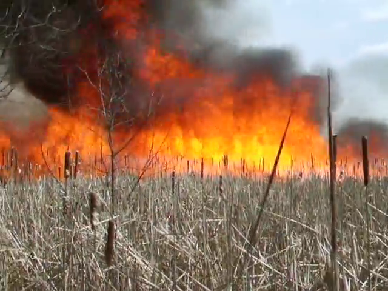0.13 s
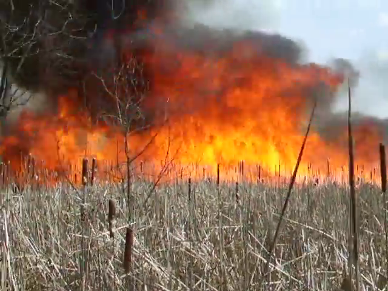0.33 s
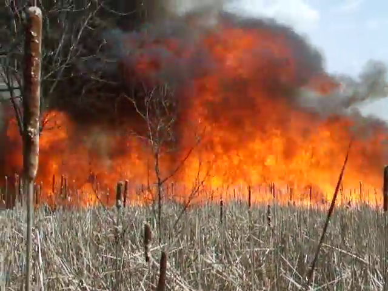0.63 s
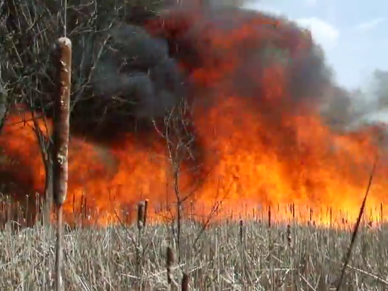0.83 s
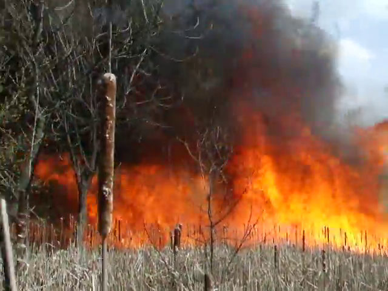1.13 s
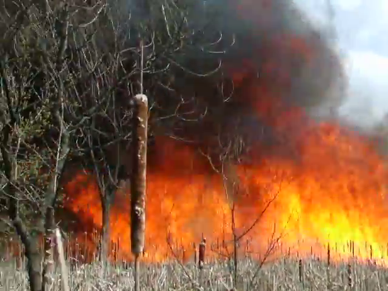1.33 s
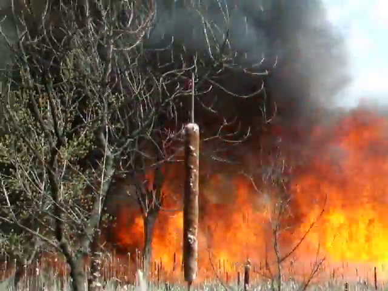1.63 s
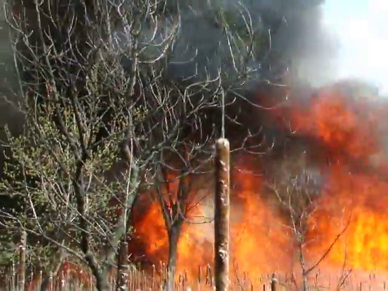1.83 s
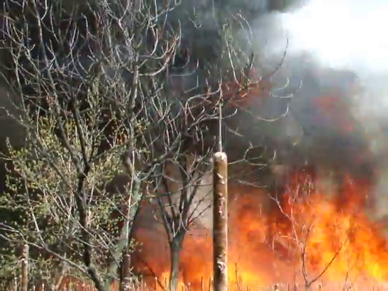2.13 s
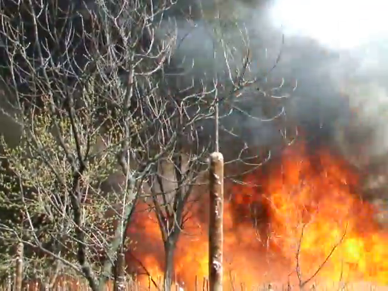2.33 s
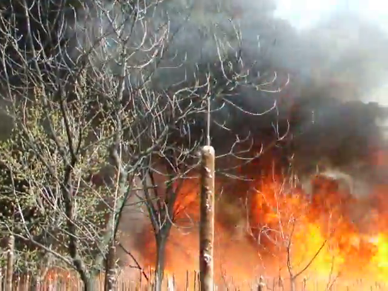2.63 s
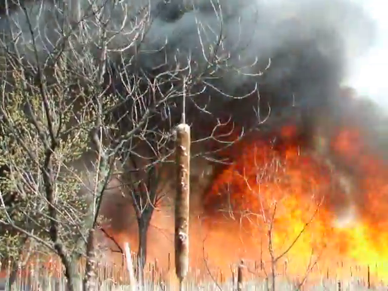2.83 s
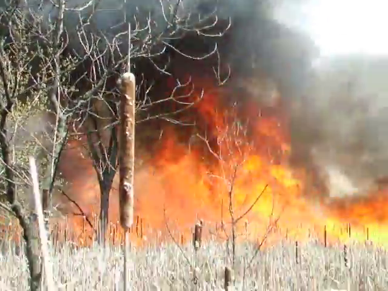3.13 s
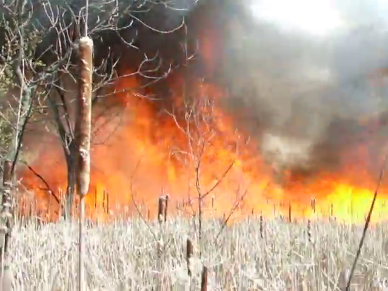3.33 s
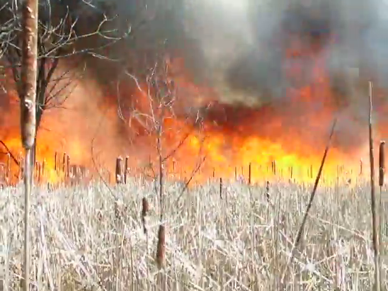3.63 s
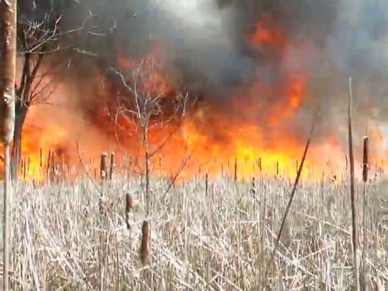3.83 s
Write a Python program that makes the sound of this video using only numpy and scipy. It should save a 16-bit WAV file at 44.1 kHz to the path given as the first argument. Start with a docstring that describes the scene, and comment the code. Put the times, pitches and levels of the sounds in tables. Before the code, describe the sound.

A wide fire in dry marsh reeds roars steadily over low rumble, with dense nearby crackle and hiss. Two pops come at the start; a faint falling bird-like chip at 1.04 s. Stems snap in a cluster around 1.5-1.6 s and again near 2 s. Bright sizzle swells about 2.4 and 3.5 s, with sharpest snaps from 3.4 to 3.9 s. A faint wavering mid-pitched hum fades. Open air, small mono microphone, treble cut steeply.

```python
"""Flames rumble under the blurred roar of far snaps as a wide front of dry reeds burns across open marsh.
Nearer stalks crackle and sizzle: dense ringing grains over hiss. Stems burst in short volleys of clicks.
A faint narrow hum is resonated noise that fades; one bird-like chip is a falling sine.
A small mono microphone picks it up; a resampler's low-pass cuts the top steeply."""
import sys
import numpy as np
from scipy import signal
from scipy.fft import rfft, irfft
from scipy.io import wavfile

SR = 44100
rng = np.random.default_rng(int(sys.argv[2]) if len(sys.argv) > 2 else 0)


def gain_from_db(level_db):
    """Turn a decibel level (scalar or array-like) into a linear amplitude factor."""
    decades = np.asarray(level_db, float) / 20
    return 10 ** decades


def generate_wav(sig):
    """Save sig (samples, or channels by samples) to the path in sys.argv[1] as 16-bit PCM at SR."""
    pcm = np.round(np.clip(np.atleast_2d(sig).T, -1, 1) * 32767).astype(np.int16)
    wavfile.write(sys.argv[1], SR, pcm)


N = 176400  # 4 s
TIME_S = np.arange(N) / SR


def rms_one(x):
    """Scale to unit rms."""
    return x / np.sqrt(np.mean(x ** 2) + 1e-20)


def level(rows):
    """Gain per sample, linear in dB between (t/s, level/dB) rows."""
    return gain_from_db(np.interp(TIME_S, *np.transpose(rows)))


def colour(x, points):
    """Shape a signal by (f/Hz, level/dB) points on a log frequency axis; rms 1."""
    hz, db = np.transpose(points)
    bins_hz = np.arange(N // 2 + 1) * SR / N
    gain = gain_from_db(np.interp(np.log(bins_hz + 1), np.log(hz), db))
    return rms_one(irfft(rfft(x) * gain, N))


def drift(rate_hz):
    """Slow random wander, rms 1: noise through a double one-pole low-pass at SR / 40."""
    r = np.exp(-80 * np.pi * rate_hz / SR)
    noise = rng.standard_normal(N // 40 + 2002)
    slow = signal.lfilter([1], [1, -2 * r, r * r], noise)[2000:]  # settled part
    slow = rms_one(slow - slow.mean())
    return np.interp(np.arange(N) / 40, np.arange(len(slow)), slow)


def resonate(x, hz, width_hz):
    """Two-pole resonance in which a unit click rings at height about 1."""
    r = np.exp(-np.pi * width_hz / SR)
    w = 2 * np.pi * hz / SR
    return signal.lfilter([0, np.sin(w)], [1, -2 * r * np.cos(w), r * r], x + 1e-18)


def grains(per_s, spread_db, low_hz, high_hz, cycles):
    """Random snaps of uneven size, each ringing a few cycles at one of 16 pitches, flat per Hz; rms 1."""
    sizes_db = spread_db * np.minimum(rng.exponential(1, N), 5)
    sizes = gain_from_db(sizes_db) * rng.choice([-1, 1], N)
    clicks = sizes * (rng.random(N) < per_s / SR)
    pitch_index = rng.integers(0, 16, N)
    total = np.zeros(N)
    for k, hz in enumerate(np.geomspace(low_hz, high_hz, 16)):
        total += hz * resonate(clicks * (pitch_index == k), hz, 2.86 * hz / cycles)
    return rms_one(total)


def rumble():
    """Turbulent burning: low noise with a slightly wandering level."""
    # rumble spectrum: f/Hz, level per Hz/dB
    spectrum = [(8, -23.5), (20, -2.5), (65, 0), (200, 0), (300, -3), (390, -11.5), (600, -25), (2000, -69)]
    return gain_from_db(-35 + .5 * drift(6)) * colour(rng.standard_normal(N), spectrum)


def roar():
    """Distant snaps too many to tell apart: coloured noise."""
    # roar spectrum: f/Hz, level per Hz/dB
    spectrum = [(150, -39.5), (390, -8), (600, -2.5), (850, 0), (1100, -3), (1400, -5), (1750, -12.5),
                (2500, -15), (5000, -13.5)]
    # roar level: t/s, level/dB
    swell = [(0.0, -30), (0.59, -31), (1.14, -30), (2.91, -30.5), (4.0, -32.5)]
    return level(swell) * gain_from_db(0.27 * drift(15)) * colour(rng.standard_normal(N), spectrum)


def snaps_and_hiss(clump, low_hz, high_hz):
    """Dense ringing snaps, their rate following the clumps, over white hiss."""
    snaps_per_s, spread_db, cycles = 2500, 2, 2.3
    snap_share = 0.48  # of power
    snaps = grains(snaps_per_s * clump ** 2, spread_db, low_hz, high_hz, cycles)
    return np.sqrt(snap_share) * snaps + np.sqrt(1 - snap_share) * rng.standard_normal(N)


def crackle(clump):
    """Nearer stalks: clumped snaps and hiss shaped by one spectrum."""
    # crackle spectrum: f/Hz, level per Hz/dB
    spectrum = [(500, -27), (1400, -2.5), (2000, 0), (2600, -3), (4200, -3), (5800, -8.5), (7400, -8.5),
                (8200, -14), (9500, -10)]
    # crackle level ahead of clumping: t/s, level/dB
    swell = [(0.0, -33.5), (1.07, -35.5), (1.63, -33), (2.49, -34.5), (2.93, -34.5), (3.59, -34.5),
             (4.0, -36)]
    return clump * level(swell) * colour(snaps_and_hiss(clump, 1000, 10000), spectrum)


def sizzle(clump):
    """Brighter snaps and hiss through two equal resonances, plus tiny ticks; swells on its own."""
    # sizzle level ahead of clumping, ticks extra: t/s, level/dB
    swell = [(0.0, -44), (0.1, -51.5), (1.07, -49.5), (1.31, -42.5), (1.64, -38), (2.38, -33.5),
             (2.96, -41.5), (3.22, -37.5), (3.52, -32), (3.71, -35.5), (3.93, -38), (4.0, -36.5)]
    centre_hz, stage_width_hz = 7220, 3960
    ticks_per_s, tick_spread_db, tick_db = 120, 3.5, -7  # tick_db re sizzle body
    body = resonate(snaps_and_hiss(clump, 5000, 11000), centre_hz, stage_width_hz)
    body = rms_one(resonate(body, centre_hz, stage_width_hz))
    ticks = gain_from_db(tick_db) * grains(ticks_per_s, tick_spread_db, 7400, 9500, 9.4)
    return clump * level(swell) * gain_from_db(1.4 * drift(56)) * (body + ticks)


def hum():
    """Noise through two equal narrow resonances: a wavering tone that slowly fades."""
    centre_hz, stage_width_hz = 1133.3, 44
    start_db, fade_db_per_s = -40.5, 2.1
    tone = resonate(rng.standard_normal(N), centre_hz, stage_width_hz)
    tone = rms_one(resonate(tone, centre_hz, stage_width_hz))
    return gain_from_db(start_db - fade_db_per_s * TIME_S) * tone


def small_pops():
    """Rows for faint short bursts at random times, columns as the bursting stems."""
    per_s, base_db, spread_db, mean_length_s = 60, -39.5, 1, .0015
    draw = rng.random((int(per_s * N / SR), 4))
    start_s = draw[:, 0] * N / SR
    rms_db = base_db - spread_db * np.log(draw[:, 1] + .02)
    ring_hz = 8800 - 6000 * draw[:, 2] ** 2
    length_s = mean_length_s * (.5 + draw[:, 3])
    broad_db = np.full(len(draw), -3)
    return np.c_[start_s, rms_db, ring_hz, length_s, broad_db]


def pop(rms_db, ring_hz, length_s, broad_db):
    """A stem splits: a dense volley of clicks rings at its pitch, then a weaker decaying tail."""
    clicks_per_s, first_click, cycles = 11000, 2.5, 10.4
    sag_db, tail_db, tail_t60_s = -6, -11, 0.062
    t = np.arange(3000) / SR
    after_s = t - length_s
    clicks = rng.standard_normal(len(t)) * (rng.random(len(t)) < clicks_per_s / SR)
    clicks = clicks + first_click * (t == 0)
    tail = tail_db - 60 * after_s / tail_t60_s
    clicks = clicks * gain_from_db(np.where(after_s < 0, sag_db * t / length_s, tail))
    tone = resonate(np.diff(clicks, prepend=0), ring_hz, 1.75 * ring_hz / cycles)
    band = signal.butter(1, [0.48 * ring_hz, 12000], "band", fs=SR, output="sos")
    broad = signal.sosfilt(band, clicks)
    burst = tone / np.std(tone) + gain_from_db(broad_db) * broad / np.std(broad)
    volley_rms = np.sqrt(np.mean(burst[after_s < 0] ** 2))
    return gain_from_db(rms_db) * burst / volley_rms


def pops():
    """Single stems burst at set times, small ones at random."""
    # bursting stems: start t/s, volley rms level/dB, ring f/Hz, volley length/s, broad part re tone/dB
    stems = [(.033, -28, 1800, .013, 4), (.044, -25, 3200, .009, 9), (.986, -30.5, 4850, .003, -9),
             (1.303, -28.5, 2200, .003, -3), (1.5425, -23.5, 6840, 0.02, 3.5),
             (1.5655, -20.5, 3610, 0.005, -2), (1.572, -29, 5000, .012, 6), (1.602, -24, 4970, 0.0062, 4.5),
             (1.628, -26.5, 6670, 0.0023, 4.5), (1.891, -30, 4620, 0.0023, 6.5),
             (1.948, -28, 7200, .002, -3.5), (1.953, -30.5, 1300, .014, -3), (1.963, -29, 7630, 0.0018, -4),
             (1.974, -26.5, 2190, 0.0053, -5), (1.975, -29, 900, 0.0055, -4.5),
             (1.988, -28.5, 7500, 0.0025, 4), (2.025, -30.5, 7400, .002, -4.5),
             (2.312, -25, 7170, .002, -3.5), (2.447, -30.5, 5520, .003, 12),
             (2.486, -26.5, 5600, 0.012, 5.5), (2.504, -28, 6180, .007, 1.5),
             (2.588, -27.5, 6240, 0.0051, -1.5), (2.600, -27, 6880, 0.0084, 4.5),
             (2.756, -24, 6260, .002, -1), (2.812, -25.5, 4020, 0.0022, 3.5),
             (2.922, -22, 7760, 0.0016, -4.5), (3.11, -28, 7500, .003, 0), (3.341, -26.5, 6000, .005, 1.5),
             (3.351, -26.5, 6500, 0.0024, 2.5), (3.413, -27.5, 6940, 0.0025, -3.5),
             (3.4235, -21.5, 8100, 0.0049, -3), (3.5265, -25, 7520, 0.0018, -3.5),
             (3.5298, -17, 5640, .0015, -6.5), (3.562, -23.5, 6860, 0.0023, -3.5),
             (3.570, -28, 2080, .004, -8), (3.577, -28.5, 4080, .008, 7), (3.604, -26.5, 6480, .004, 4),
             (3.728, -28, 6620, 0.012, 3), (3.750, -27.5, 6240, .002, -22), (3.781, -25.5, 8100, .003, 4.5),
             (3.825, -31.5, 4940, .012, 0.5), (3.858, -17.5, 7940, .002, -8),
             (3.858, -22, 3100, 0.0018, -10.5), (3.888, -17.5, 5850, 0.0023, -5),
             (3.988, -26.5, 6600, .002, -16.5)]
    out = np.zeros(N + SR)
    for start_s, *settings in [*stems, *small_pops()]:
        burst = pop(*settings)
        start = int(start_s * SR)
        out[start:start + len(burst)] += burst
    return out[:N]


def chip():
    """One short whistle, probably a far bird: a falling sine of unsteady level."""
    start_s, length_s = 1.042, .05
    from_hz, to_hz, mean_db = 4800, 4280, -39
    u = np.clip((TIME_S - start_s) / length_s, 0, 1)
    hz = to_hz + (from_hz - to_hz) * (1 - u) ** 2.5
    envelope = np.sqrt(np.sin(np.pi * u) + 1e-12)
    return gain_from_db(mean_db + 3 * drift(60)) * envelope * np.sin(2 * np.pi * np.cumsum(hz) / SR)


def scene():
    """All sources in the open air; crackle and sizzle share their clumping."""
    clump = gain_from_db(.6 * drift(60) + .3 * drift(12))
    mix = rumble() + roar() + crackle(clump) + sizzle(clump) + hum() + pops() + chip()
    return mix[None]


def roll_off(x):
    """The treble ends steeply here."""
    return signal.sosfilt(signal.butter(12, 9290, fs=SR, output="sos"), x)


def record(dry):
    """Small mono microphone: peaks are rounded; a resampler's low-pass cuts the top; an offset is added."""
    # microphone response and resampler's low-pass together: f/Hz, level/dB
    response = [(20, 2.5), (7500, 0), (8000, -3.5), (8500, -13), (8800, -24.5), (9100, -41.5), (9400, -74),
                (22050, -90)]
    ceiling, offset = .7, -.0024  # full scale = 1
    rounded = ceiling * np.tanh(dry[0] / ceiling)
    mix = colour(rounded, response) * np.std(dry) + offset  # rms kept ahead of the offset
    return roll_off(mix[None])


dry = scene()
out = record(dry)
generate_wav(out)
```